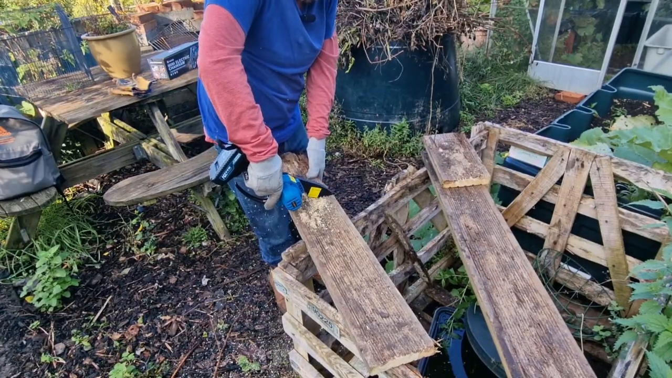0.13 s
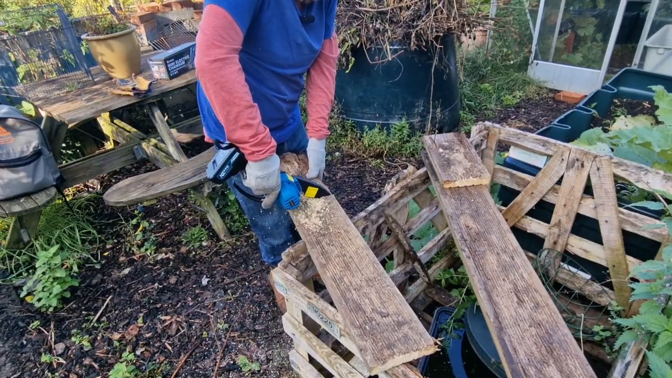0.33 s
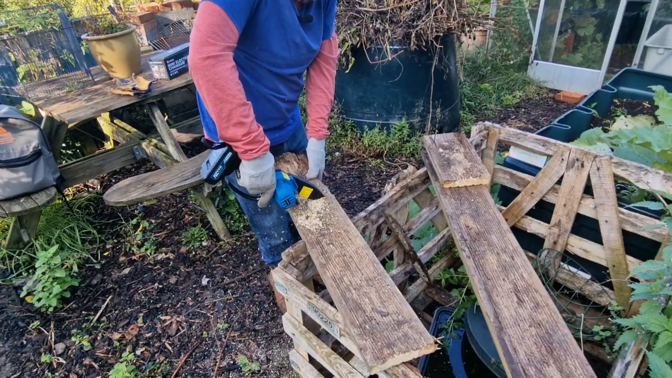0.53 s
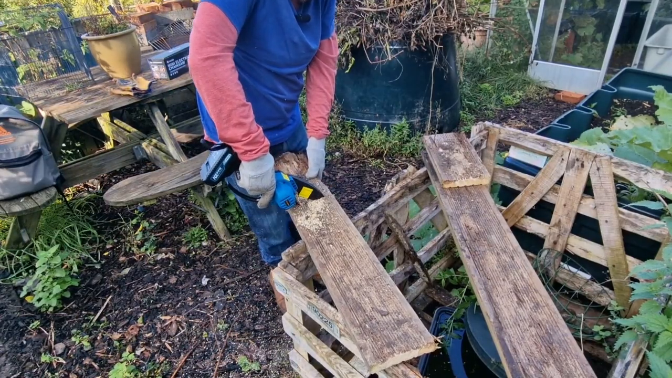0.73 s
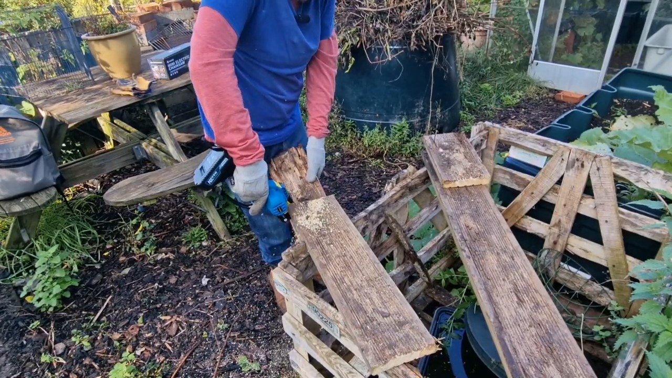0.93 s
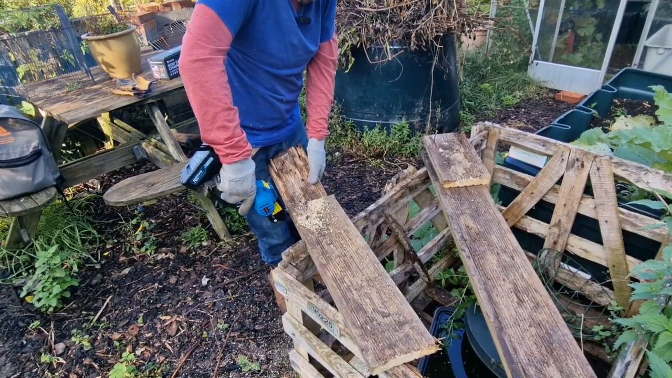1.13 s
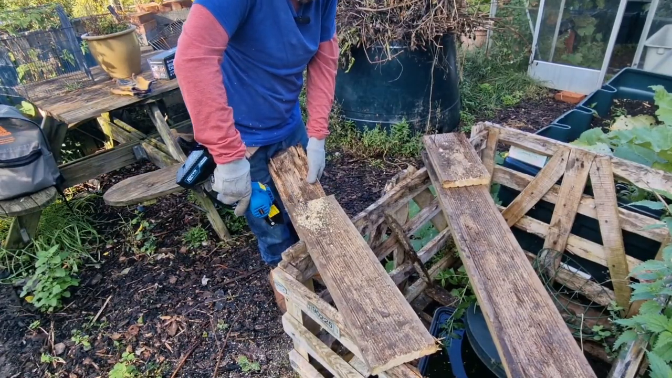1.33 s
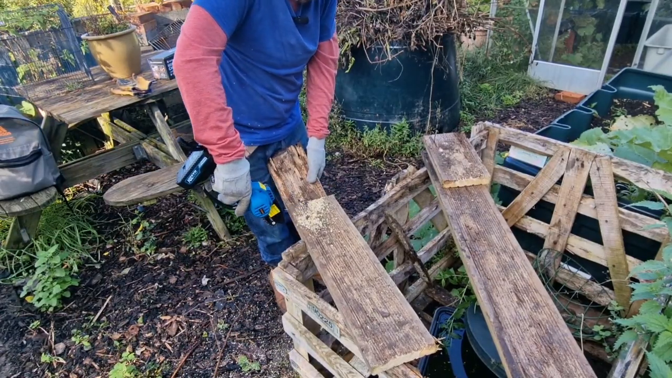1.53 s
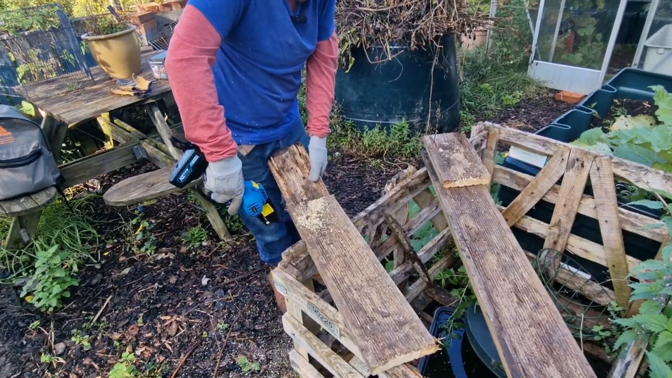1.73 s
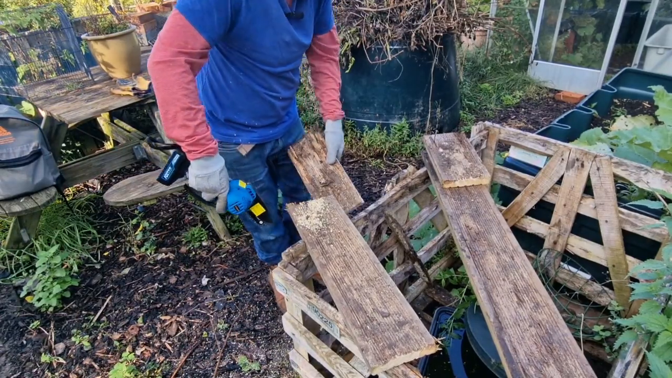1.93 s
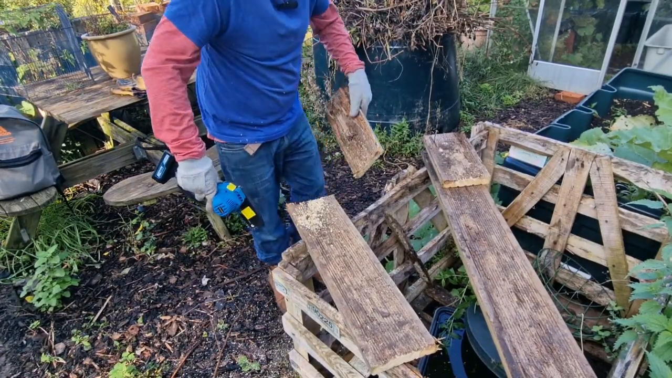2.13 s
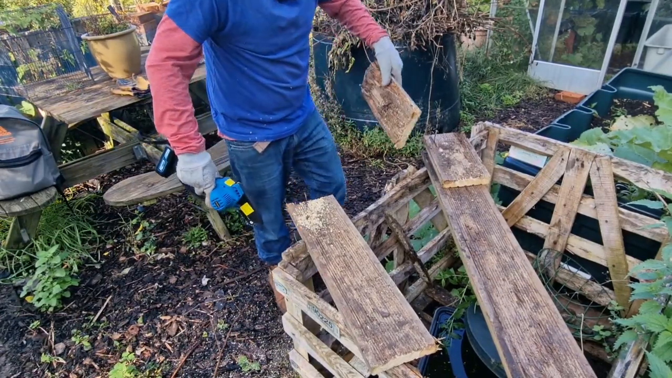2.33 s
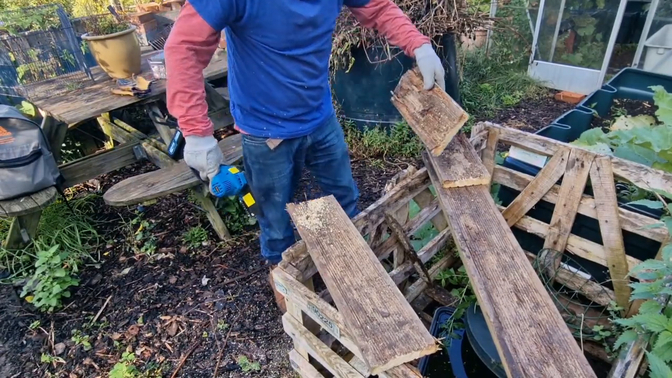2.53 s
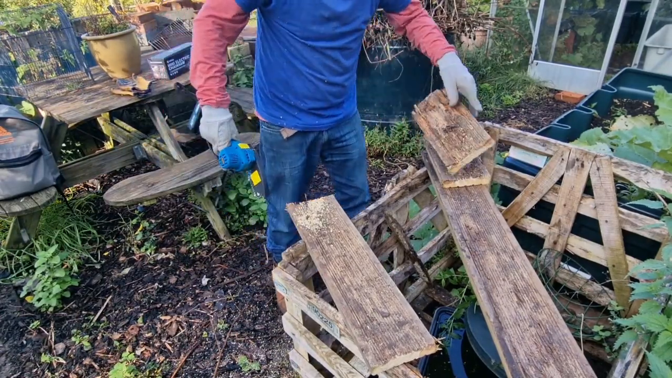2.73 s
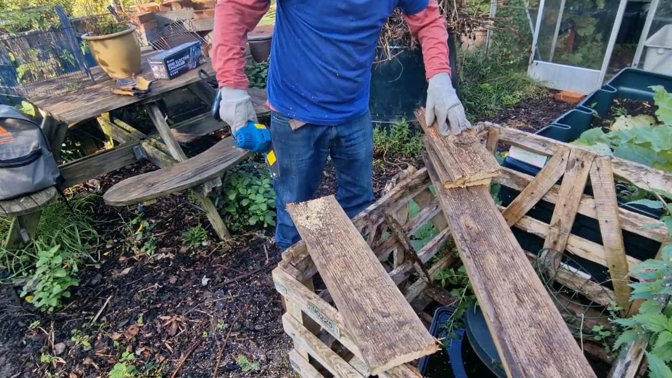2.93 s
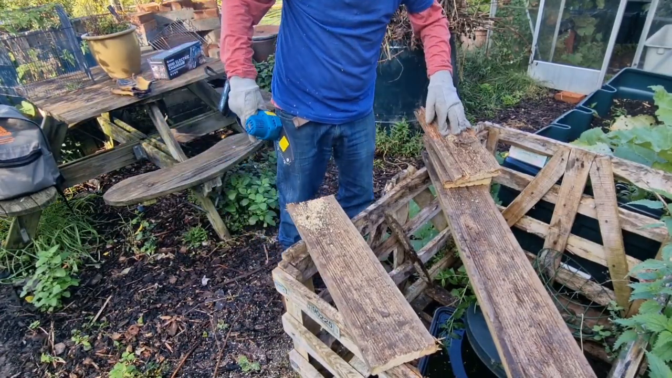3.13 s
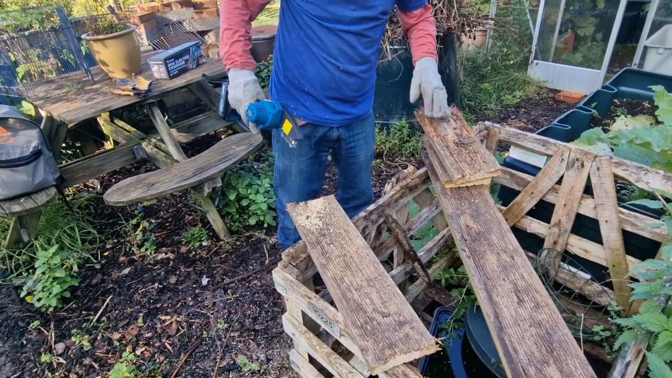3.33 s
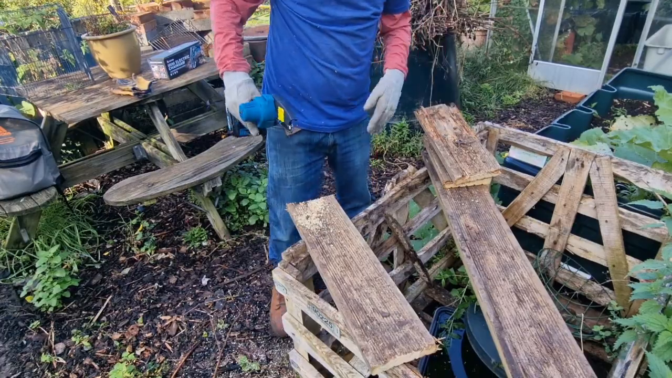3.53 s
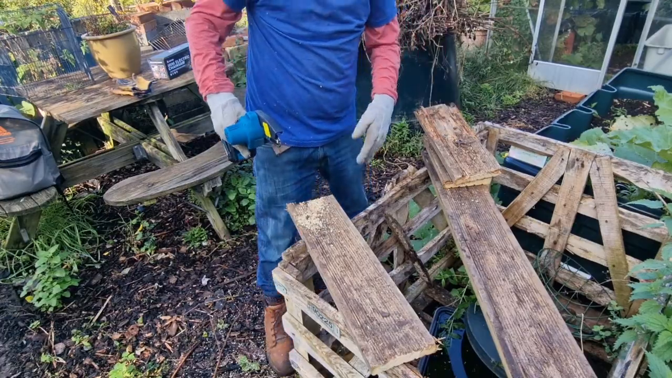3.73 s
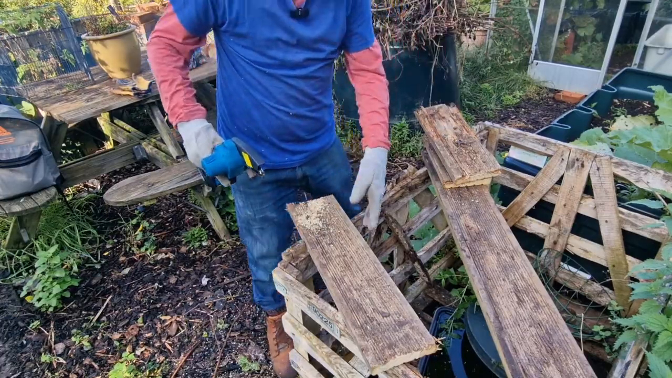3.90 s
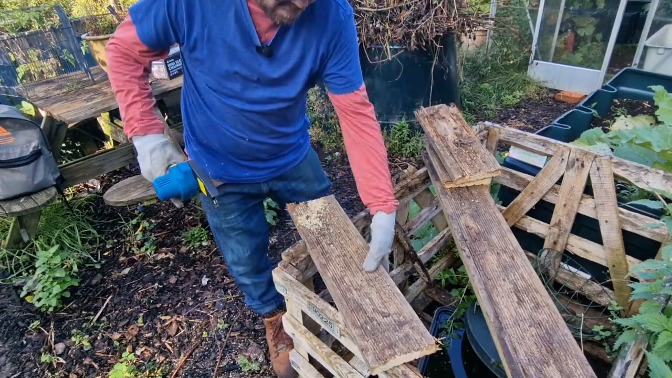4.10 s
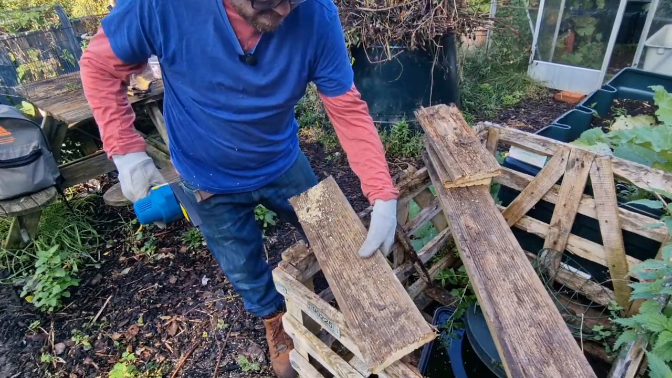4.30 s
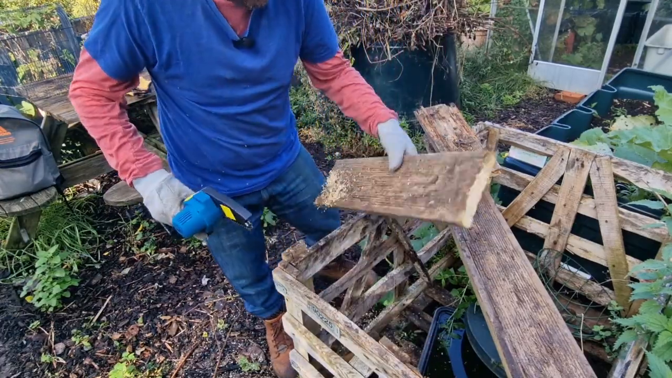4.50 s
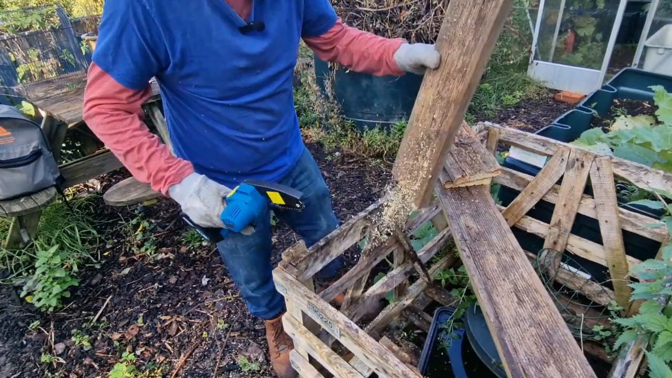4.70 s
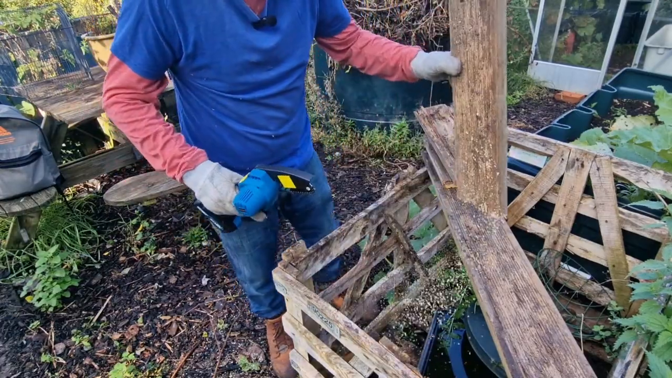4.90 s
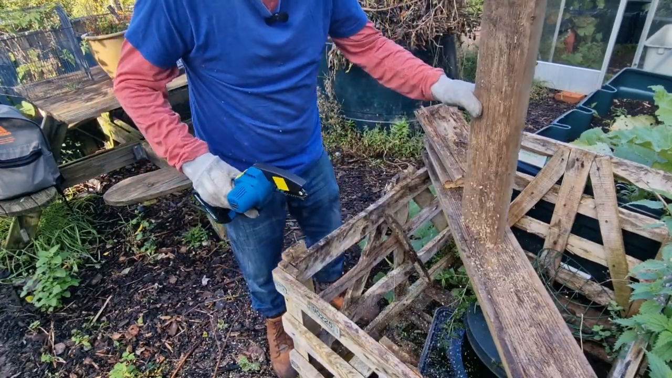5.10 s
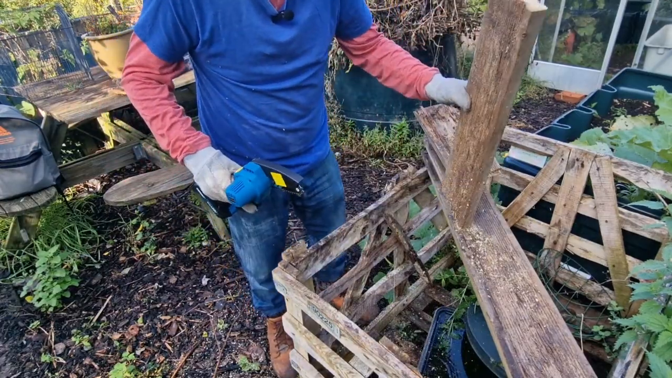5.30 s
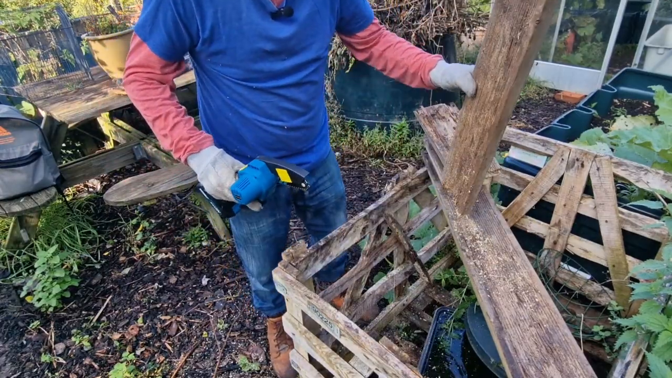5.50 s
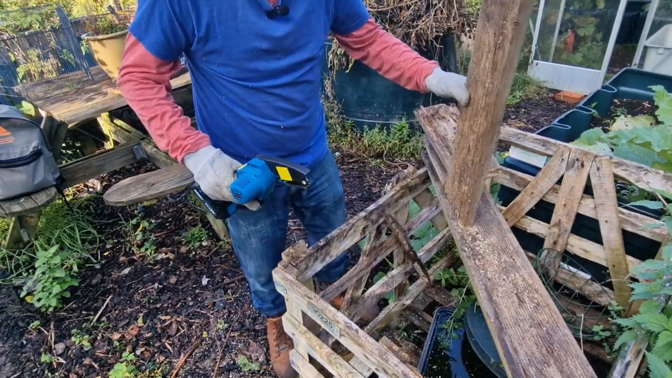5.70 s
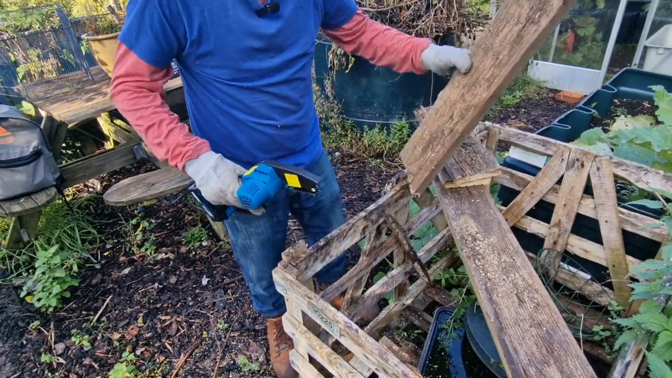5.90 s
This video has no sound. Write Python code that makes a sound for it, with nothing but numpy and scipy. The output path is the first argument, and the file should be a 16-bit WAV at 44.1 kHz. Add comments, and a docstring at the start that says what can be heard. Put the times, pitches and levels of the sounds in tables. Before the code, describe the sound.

Harsh rattling electric saw bites wood, cracks through and whirs to a stop; afterwards come dull wooden knocks, glove rustle and faint garden air.

```python
"""A small chainsaw cutting an old board

A battery saw chatters through the board, breaks through and coasts to a stop: random link strikes, filtered.
An offcut drops on a plank and the board, stood on end, knocks three times: sums of decaying modes.
Gloves and sleeves rustle as noise grains, and a small far bird sings as narrow bands of gliding noise.
A shed wall and pallets return the board's knocks and the cracks, over a low outdoor wash of filtered noise."""
import sys
import numpy as np
from scipy import signal
from scipy.fft import rfft, irfft
from scipy.io import wavfile
from scipy.ndimage import uniform_filter1d

SR = 44100
rng = np.random.default_rng(int(sys.argv[2]) if len(sys.argv) > 2 else 0)


def store_wav(level_fs):
    """Save 16-bit WAV to argv[1]."""
    pcm = np.round(np.clip(np.atleast_2d(level_fs), -1, 1) * 32767)
    wavfile.write(sys.argv[1], SR, pcm.T.astype(np.int16))


N = 262395
T = np.arange(N) / SR

# how hard the wood brakes the chain: (time [s], load [0-1])
LOAD = [(0, 0.87), (.44, 0.97), (.525, 0.99), (.6, 0.45), (.89, .27), (.96, 0.01)]
# spectra of the steel rattle, bar entering the board, deep in it, running free: (frequency [Hz], relative level [dB])
STEEL_ENTERING = [(2650, -43), (4500, -11.5), (4820, -17.5), (5360, -10), (6030, -13), (6660, -5.5),
                  (7410, -3.5), (9020, -9.5), (9660, -10), (12300, -5.5), (13900, -0.5), (16000, -10)]
STEEL_CUTTING = [(2650, -42.5), (4500, -19.5), (4900, -13.5), (6420, -6.5), (6810, -8), (7370, -4.5),
                 (8150, -4.5), (9920, -10), (12000, -1.5), (13500, 1), (14200, 0.5), (16000, -9)]
STEEL_FREE = [(2650, -51.5), (4500, -23.5), (5450, -13), (6320, -19.5), (7220, -5), (8200, -11),
              (8830, -2.5), (9870, -13.5), (10900, -11.5), (11800, -12.5), (12700, -12), (14100, 2.5),
              (15100, -1), (16000, -7)]
# spectra of the rasp of the teeth, in the wood and free: (frequency [Hz], relative level [dB])
RASP_CUTTING = [(710, -34), (1200, -13), (1320, -29), (1690, -5), (1810, -0.5), (2080, 0), (2460, -11.5),
                (2570, -7.5), (3020, -7), (3390, -1.5), (3760, 3), (4800, -13), (6240, -32.5),
                (10600, -120)]
RASP_FREE = [(710, -43), (1200, -17.5), (1410, -9.5), (1850, 4), (2010, -1), (2190, 2.5), (2820, -12),
             (3140, -11), (3530, 2), (3680, -3.5), (4220, -4), (4800, -12), (6240, -30), (10600, -120)]
# spectra of the saw's housing and of the board shaken by the teeth: (frequency [Hz], relative level [dB])
HOUSING = [(120, -48), (200, -24.5), (308, -15), (393, -8), (494, -6.5), (785, -6.5), (852, -7),
           (1020, -3.5), (1400, -17.5), (1820, -43.5), (3080, -120)]
BOARD_DRONE = [(45, -54.5), (85, -19.5), (140, -1), (210, -2), (280, -3.5), (380, 0), (450, -3.5), (560, 0),
               (740, -6), (850, 1), (1000, -0.5), (1250, -13), (1500, -14.5), (2500, -48)]
# the chain binds in the kerf and its whine swells: (centre time [s], level [dB], length [s])
BINDS = [(.465, -22.5, .04), (.543, -20, 0.055), (.665, -20.5, 0.1), (.83, -27.5, 0.062)]
# modes of the three pieces of wood: (frequency [Hz], relative level [dB], 60 dB decay time [s])
SAWN_END = [(114.1, -18, 0.077), (190, -14.5, 0.13), (379.2, 5, 0.14), (554, -6, .06)]
OFFCUT = [(93, -9, 0.028), (167, 5, 0.035), (321, 1, 0.11), (451, -2.5, 0.089), (586, 1.5, 0.073),
          (684, 4, 0.057), (876, 10, 0.05), (1036, -3, 0.1), (1510, -24, 0.06), (1765, -11, .06),
          (1880, 7.5, 0.032), (2600, -26, .06)]
BOARD = [(92, -6.5, 0.068), (154, -8.5, 0.067), (218, -5.5, 0.059), (287.3, -5.5, 0.11), (459, -3, 0.05),
         (603, -1, 0.036), (703, -2.5, 0.087), (816, -2, 0.042), (1024, -2, 0.077), (1410, -27, 0.087),
         (1810, -24, 0.053)]
# blows on the same three pieces: (time [s], level [dB], frequency above which a soft contact fades [Hz])
BREAK = [(.9075, -8.5, 894)]
OFFCUT_BLOWS = [(2.85, -4.5, 330), (2.863, -8, 600), (2.87, -27, 800), (2.8896, -3.5, 1540),
                (2.9, -3.5, 960), (2.917, -8.5, 550), (2.948, -19, 950)]
BOARD_BLOWS = [(5.1035, -4.5, 454), (5.1096, -1, 842), (5.119, -5, 890), (5.363, -25.5, 900),
               (5.374, -16.5, 455), (5.681, -7, 330), (5.687, -10, 700), (5.694, -7, 635)]
# fibres snap and grit is crushed: (time [s], level [dB], centre [Hz], width [octaves], decay constant [s])
CRACKS = [(0.989, -.5, 2305, 0.17, .0013), (1.028, -9.5, 2360, .15, .0012),
          (2.26, -45, 14130, 0.24, 0.0047), (2.573, -39, 686, .55, .0043), (2.847, -32.5, 11000, 1.8, .008),
          (2.874, -27.5, 2100, 0.43, .0036), (2.909, -20, 14500, 0.62, .007),
          (2.93, -25, 2480, 0.29, 0.003), (3.074, -44.5, 9000, 1, .003), (3.137, -46, 13000, .5, 0.0032),
          (3.309, -32.5, 8000, 3.6, 0.0043), (3.31, -35, 1010, .099, .0056),
          (4.247, -33.5, 12100, .4, 0.0041), (5.103, -18, 10800, .23, .0013),
          (5.119, -17, 8200, 0.064, .0013), (5.225, -33.5, 10500, 0.45, .01),
          (5.36, -22.5, 9000, 2.9, 0.013), (5.364, -5.5, 11200, 1.48, .0019),
          (5.6807, -8.5, 12000, 1.9, 0.0019), (5.692, -19.5, 11000, 1.2, 0.0052)]
# reflections off the shed and pallets: (delay [s], level [dB])
ECHOES = [(.024, -21), (.044, -11.5), (.071, -23)]
# spectrum of cloth and sawdust: (frequency [Hz], relative level [dB])
RUSTLE_COLOUR = [(880, -21.5), (1500, 0), (2690, -1), (3000, -3.5), (3920, 1.5), (5020, -1.5), (8080, -2),
                 (8920, -2), (11200, 0.5), (14200, 1.5), (14900, 4), (16000, -8)]
# moves of glove and sleeve, and wood sliding on wood: (centre time [s], level [dB], length [s])
BRUSHES = [(2.42, -61, 0.18), (2.625, -49.5, 0.031), (2.775, -48, 0.033), (2.8, -60, 0.53),
           (3.36, -51, .16), (4.19, -49.5, 0.2), (4.66, -52.5, 0.87), (5.06, -46, 0.22),
           (5.215, -45.5, 0.086), (5.65, -60.5, 1)]
SLIDES = [(3.36, -53.5, 0.21), (4.15, -58, 0.19), (5.04, -49, 0.12)]
# bird notes: (time [s], length [s], start frequency [Hz], end frequency [Hz], level [dB], width [Hz])
BIRD = [(4.34, 0.54, 7870, 8180, -65, 120), (4.869, 0.017, 6400, 7400, -34.5, 1320),
        (5.293, 0.26, 5370, 5400, -66, 90), (5.729, 0.17, 3630, 3800, -62, 50)]
# level of the background: (time [s], level [dB])
AIR_DB = [(2.15, -58), (2.55, -50.5), (3.8, -51), (5.05, -45), (5.3, -53), (5.95, -53)]
# spectrum of the outdoor wash: (frequency [Hz], relative level [dB])
AIR = [(15, -39), (25, -16), (41, -12), (60, -5), (134, -11), (192, -16.5), (264, -11.5), (306, -15.5),
       (341, -13.5), (510, -14.5), (631, -13.5), (747, -14.5), (905, -12.5), (2350, -31.5), (4000, -28.5),
       (5200, -55.5), (8800, -120)]

# parts of the saw's sound: (level running free [dB], rise at full load [dB], loss per tenfold slowing [dB])
STEEL_LAW = (-11, -1.3, 28.4)
RASP_LAW = (-26, 6.76, 20)
HOUSING_LAW = (-32.5, 6.7, 17.2)
WHINE_LAW = (-35.5, 10, 58)
HUM_LAW = (-43, 1, 56)
# crunch of the rough surface under a blow of 1 kHz softness, offcut and board only:
# (level relative to the blow [dB], centre [Hz], width [octaves], decay constant [s])
CRUNCH = (-33, 2200, 1.5, 0.01)

# the cut: the bar stops bouncing, the board parts, the trigger is let go, the chain stands still
SEATED_S, THROUGH_S, RELEASE_S, STOP_S = .37, .9, 1.13, 1.659
FREE_HZ, SAG = 404.5, .33  # unloaded rate of links past the sprocket; share lost at full load
# drone of the board at no load, rise at full load, change while the bar still bounces
DRONE_DB, DRONE_LOAD_DB, DRONE_UNSEATED_DB = -33, 11, -6.5
# the bar bounces on the board: first landing, first hop, growth of each further hop
BOUNCE_START_S, BOUNCE_GAP_S, BOUNCE_GROWTH_S = .0155, .026, .0021
# first bounce, gain per bounce, part of each hop spent in the wood
BOUNCE_DB, BOUNCE_RISE_DB, CONTACT_SHARE = -19, 0.3, 0.37
SETTLE_S, SETTLE_DB = .29, -4.5  # from here on the groove holds the bar and softens the bounces
BITE_DECAY_S = 0.0057  # the board rings on after each bounce
HOP_DB, HOP_RASP_DB = -2.25, -2  # steel rattle and rasp while the bar is off the wood
CRUNCH_LEAD_S = 0.0032  # the surface gives way just before the wood rings
HISS_DB = -9.5  # steady rustle, relative to the garden air
TICKS_PER_S, TICK_DB = 12, 3.5  # crumbs of sawdust, relative to the rustle
CUTOFF_HZ = 15790


def chainsaw():
    """Periodic and random excitation: rattle, rasp, whine and hum follow the chain; contact blends the spectra."""
    link_hz, _, _ = motor()
    depth = ramp(0.45, 0.29)  # the bar sinks into the board
    clear = np.clip(.85 * ramp(THROUGH_S, .055), 0, 1)  # the bar comes out, some chips still in the chain
    cutting, free = np.sqrt(1 - clear), np.sqrt(clear)
    entering, deep = np.sqrt(1 - depth), np.sqrt(depth)

    links_passed = np.cumsum(link_hz * (1 + 0.0077 * wander(46))) / SR
    landing = 1 + .15 * np.cos(2 * np.pi * links_passed)  # each link lands on the sprocket
    sway = amp(0.99 * wander(60))  # the slack chain flaps on the bar
    links = rattle(link_hz, hits_per_link=7, ring_s=0.0012, spread_db=-0.5, hiss=.3)
    links = ringing(links * landing * sway, t60=.03, direct=7.1)
    teeth = rattle(link_hz, hits_per_link=3.2, ring_s=0.0007, spread_db=3.0, hiss=.5)
    teeth = ringing(teeth * sway, t60=0.22, direct=2.3)

    buried = entering * colour(links, STEEL_ENTERING) + deep * colour(links, STEEL_CUTTING)
    buried /= entering + deep
    steel = (cutting * buried + free * colour(links, STEEL_FREE)) / (cutting + free)
    rasp = cutting * colour(teeth, RASP_CUTTING) + free * colour(teeth, RASP_FREE)
    rasp /= cutting + free
    scrape = loudness(RASP_LAW) * rasp + loudness(HOUSING_LAW) * colour(teeth, HOUSING)
    _, lifted = bouncing(count=11)
    noise = amp(HOP_DB * lifted) * loudness(STEEL_LAW) * steel
    noise += amp(HOP_RASP_DB * lifted) * scrape

    whine_level = loudness(WHINE_LAW) * ramp(SEATED_S, 0.1) + swells(BINDS)
    whine = whine_level * np.sin(4 * np.pi * links_passed)  # twice the link rate
    hum = loudness(HUM_LAW) * np.sin(2 * np.pi * links_passed)
    tones = np.sqrt(2) * (whine + hum) * amp(2.2 * wander(60) - 2.0)
    return off_board(noise, share=0.16, delay_s=.0013) + tones


def motor():
    """Load drags on speed and even friction brakes the coast: gives link rate, load and coasting share."""
    load = np.maximum(curve(LOAD), 0)
    coast = 1 - ramp(RELEASE_S, STOP_S - RELEASE_S)
    return FREE_HZ * (1 - SAG * load) * coast, load, coast


def loudness(law):
    """Power law of radiation: the gain of one part of the saw, from load and coasting speed."""
    free_db, load_db, coast_db = law
    _, load, coast = motor()
    return amp(free_db + load_db * load + coast_db * np.log10(coast + 1e-6))


def rattle(link_hz, hits_per_link, ring_s, spread_db, hiss):
    """Random impacts: each strike is a short noise burst, and strikes grow sparser as the rate falls."""
    struck = rng.random(N) < hits_per_link * np.maximum(link_hz, 30) / SR
    strikes = struck * amp(spread_db * np.clip(rng.standard_normal(N), -2, 2)) ** 2
    power = signal.lfilter([1], [1, -np.exp(-1 / (ring_s * SR))], strikes)
    power = power / (abs(uniform_filter1d(power, size=2200)) + 1e-6)  # even out the level over 50 ms
    return np.sqrt(power + abs(hiss)) * rng.standard_normal(N)


def ringing(x, t60, direct):
    """High modal density: overlapping modes of a small part prolong every strike, as decaying noise."""
    t = np.arange(SR // 10) / SR
    response = rng.standard_normal(len(t)) * amp(-60 * t / t60)
    return direct * x + signal.oaconvolve(x, response / np.linalg.norm(response))[:N]


def off_board(x, share, delay_s):
    """Comb interference with a board reflection, whose path shifts as the hand moves."""
    delay = delay_s * (1 + 0.14 * wander(2))
    return (x + share * np.interp(T - delay, T, x)) / np.hypot(1, share)


def bouncing(count):
    """Intermittent contact with lengthening hops: gives bounce level and lift off the wood (0-1)."""
    k = np.arange(count)
    gaps = BOUNCE_GAP_S + BOUNCE_GROWTH_S * k  # the hops lengthen as the teeth dig in
    starts = BOUNCE_START_S + np.cumsum(gaps) - gaps
    settled = np.clip((starts - SETTLE_S) / .03, 0, 1)
    strength = amp(BOUNCE_DB + BOUNCE_RISE_DB * k + SETTLE_DB * settled)
    latest = np.maximum(np.searchsorted(starts, T) - 1, 0)
    since = T - starts[latest]
    after_contact = np.clip(since - CONTACT_SHARE * gaps[latest], 0, 1)
    touching = np.clip(since / 0.00055, 0, 1) * np.exp(-after_contact / BITE_DECAY_S)
    return strength[latest] * touching, (1 - touching) * (1 - ramp(SEATED_S, .02))


def kerf():
    """Forced vibration of a plate: teeth tug at the board, and its thinning neck passes less bass."""
    link_hz, load, _ = motor()
    tugs = rattle(link_hz, hits_per_link=3.7, ring_s=0.0011, spread_db=4.5, hiss=.4)
    body = colour(tugs, BOARD_DRONE)
    bass = signal.sosfiltfilt(signal.butter(3, 270, fs=SR, output="sos"), body)
    body = body - bass * ramp(.52, .046)
    tearing = amp(-7.5) * band(N, 1900, 0.5)  # each bounce rips fibres
    bounces, _ = bouncing(count=11)
    unseated = 1 - ramp(SEATED_S, .07)
    drone = amp(DRONE_DB + DRONE_LOAD_DB * load + DRONE_UNSEATED_DB * unseated)
    return (body * np.hypot(drone, bounces) + tearing * bounces) * (1 - ramp(THROUGH_S, .08))


def knocks(blows, modes, clatter_db, clatter_t60):
    """Modal synthesis: each blow rings the modes of the wood and shakes the loose stack under it."""
    t, out = np.arange(SR // 3) / SR, np.zeros(N)
    hz, db, t60 = np.transpose(modes)[:, :, None]
    sign = (-1) ** np.arange(len(hz))[:, None]
    for s, level_db, soft_hz in blows:
        weight = amp(db) / np.sqrt(1 + (hz / soft_hz) ** 4)  # a soft contact spares the high modes
        weight = weight / np.linalg.norm(weight)
        detune = 1 + 0.036 * rng.standard_normal(hz.shape)  # the point of contact shifts
        partials = sign * weight * amp(-60 * t / t60) * np.sin(2 * np.pi * hz * detune * t)
        ring = partials.sum(0)
        clatter = band(len(t), 0.4 * soft_hz, 1.0) * amp(clatter_db - 60 * t / clatter_t60)
        onset = 1 - np.exp(-t / 0.00014)
        add(out, s, amp(level_db) * (0.98 * ring + clatter) * onset)
    return out


def cracks():
    """Impulsive fracture: bursts of snapping fibres and grit; each blow of offcut and board adds a crunch."""
    lead = .005  # room for the filter to spread ahead of the burst [s]
    t, out = np.maximum(np.arange(SR // 8) / SR - lead, 0), np.zeros(N)
    crunches = []
    for s, db, soft_hz in OFFCUT_BLOWS + BOARD_BLOWS:
        crunch_db = db + CRUNCH[0] + 10 * np.log10(soft_hz / 1000)  # a hard blow crunches more
        crunches.append((s - CRUNCH_LEAD_S, crunch_db, *CRUNCH[1:]))
    for s, db, hz, octaves, decay_s in CRACKS + crunches:
        decay = np.exp(-t / decay_s) + .02 * np.exp(-t / 0.039)  # with a faint tail
        shape = decay * (1 - np.exp(-t / 0.0003))
        burst = bell(shape * rng.standard_normal(len(t)), hz, octaves)
        add(out, s - lead, amp(db) * burst * np.linalg.norm(shape) / np.linalg.norm(burst))
    return out


def yard(x, tail_db, tail_t60, dull_hz):
    """Early reflections and reverberation: a few dull echoes and a short thin tail, by convolution."""
    t = np.arange(SR // 2) / SR
    response = rng.standard_normal(len(t)) * amp(-60 * t / tail_t60) * (t > .008)
    response *= amp(tail_db) / np.linalg.norm(response)
    for delay, db in ECHOES:
        add(response, delay, amp([db]))
    dulled = signal.sosfilt(signal.butter(2, dull_hz, fs=SR, output="sos"), x)
    return x + signal.oaconvolve(dulled, response)[:N]


def rustle():
    """Granular friction: many small grains under the hand's uneven movement, and the hiss of sliding wood."""
    grains = rattle(400, hits_per_link=1.5, ring_s=0.0018, spread_db=2.5, hiss=1.0)
    level = np.hypot(amp(curve(AIR_DB) + HISS_DB), swells(BRUSHES))
    flutter = amp(0.88 * wander(22))  # the cloth catches and slips
    cloth = (colour(grains, RUSTLE_COLOUR) + crumbs(decay_s=.003, spread_db=5)) * level
    return flutter * (cloth + swells(SLIDES) * band(N, 3630, 0.31))


def crumbs(decay_s, spread_db):
    """Random sparse impacts: stray bits of sawdust tick as decaying bursts of treble noise."""
    ticking = rng.random(N) < TICKS_PER_S / SR
    drops = ticking * amp(TICK_DB + spread_db * rng.uniform(-1, 1, N))
    decaying = signal.lfilter([1], [1, -np.exp(-1 / (decay_s * SR))], drops)
    return decaying * band(N, 9500, .9)


def bird():
    """Narrow-band modulation of a gliding carrier: thin far whistles and one harsh chip, blurred by the garden."""
    out = np.zeros(N)
    for s, length, start_hz, end_hz, db, width_hz in BIRD:
        u = (T - s) / length
        note_hz = start_hz + (end_hz - start_hz) * np.clip(u, 0, 1)
        phase = 2 * np.pi * np.cumsum(note_hz) / SR
        shape = np.clip(4 * u, 0, 1) * np.exp(-np.maximum(T - s - length, 0) / 0.015)
        whistle = wander(width_hz) * np.cos(phase) + wander(width_hz) * np.sin(phase)
        out += amp(db) * shape * whistle
    return out


def air():
    """Broadband ambient noise: a distant outdoor wash over a steady low hum of narrow-band noise."""
    wash = colour(rng.standard_normal(N), AIR) * amp(1.6 * wander(7.6))
    hum = amp(-58) * band(N, 58, 0.1)
    return amp(curve(AIR_DB)) * wash + hum


def amp(db):
    """The decibel law: decibels to gain."""
    return 10 ** (np.asarray(db) / 20)


def unit(x):
    """Normalisation of power: scales to rms 1."""
    return x / np.sqrt(np.mean(x ** 2) + 1e-20)


def curve(rows, column=1):
    """Linear interpolation: a control joined by straight lines in time."""
    rows = np.asarray(rows, float)
    return np.interp(T, rows[:, 0], rows[:, column])


def ramp(start_s, length_s):
    """Linear transition: rises from 0 to 1."""
    return np.clip((T - start_s) / length_s, 0, 1)


def swells(rows):
    """Gaussian envelopes: smooth bumps of level, one for each (centre [s], level [dB], length [s])."""
    return sum(amp(db) * np.exp(-(2 * (T - s) / length) ** 2) for s, db, length in rows)


def wander(hz):
    """Low-passed noise: slow random motion up to about a rate; rms 1."""
    f = np.fft.rfftfreq(N, 1 / SR)
    return unit(irfft(rfft(rng.standard_normal(N)) * np.exp(-(f / hz) ** 2), N))


def colour(x, points):
    """Spectral shaping: filters by a curve drawn on log frequency; rms 1."""
    hz, db = np.transpose(points)
    f = np.fft.rfftfreq(len(x), 1 / SR)
    gain = amp(np.interp(np.log(f + 1), np.log(hz), db))
    return unit(irfft(rfft(x) * gain, len(x)))


def bell(x, hz, octaves):
    """Gaussian band-pass: keeps a bell-shaped band around hz."""
    away = np.log2((np.fft.rfftfreq(len(x), 1 / SR) + 1) / hz) / octaves
    return irfft(rfft(x) * np.exp(-away ** 2 / 2), len(x))


def band(size, hz, octaves):
    """Band-limited noise: a bell of noise around hz; rms 1."""
    return unit(bell(rng.standard_normal(size), hz, octaves))


def add(mix, s, sound):
    """Superposition: mixes a sound in at a time, in place."""
    part = mix[round(s * SR):][:len(sound)]
    part += sound[:len(part)]


def scene():
    """Superposition of the saw, the wood and the garden."""
    wood = knocks(BREAK, SAWN_END, clatter_db=-7.5, clatter_t60=.07)
    wood += knocks(OFFCUT_BLOWS, OFFCUT, clatter_db=-11, clatter_t60=0.1)
    standing = knocks(BOARD_BLOWS, BOARD, clatter_db=-10.0, clatter_t60=0.095)
    near = wood + yard(standing + cracks(), tail_db=-15.5, tail_t60=0.22, dull_hz=1770)
    return (chainsaw() + kerf() + near + rustle() + air() + bird())[None]


def record(dry):
    """Clipping and band limits: peaks stop at full scale, the microphone sheds deep bass, the top is cut."""
    clipped = np.clip(dry, -1, 1)
    thinned = signal.sosfilt(signal.butter(3, 44, "high", fs=SR, output="sos"), clipped)
    lowpass = signal.firwin(1023, CUTOFF_HZ, window=("kaiser", 9), fs=SR)
    return signal.oaconvolve(thinned, lowpass[None], "same")


dry = scene()
out = record(dry)
store_wav(out)
```